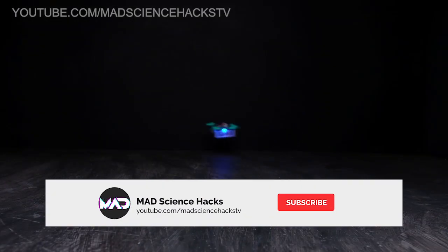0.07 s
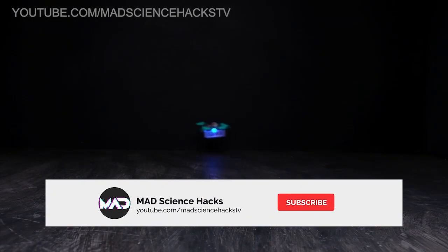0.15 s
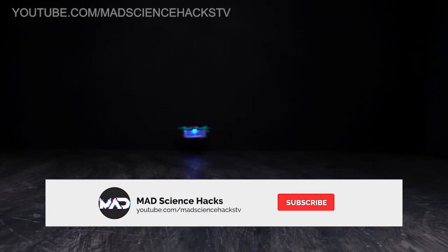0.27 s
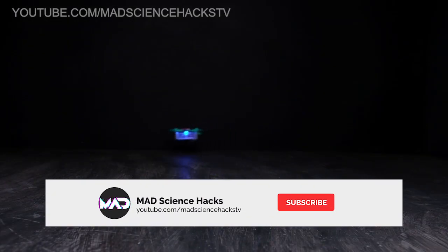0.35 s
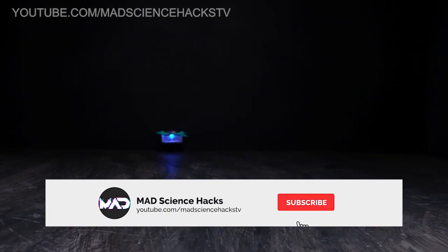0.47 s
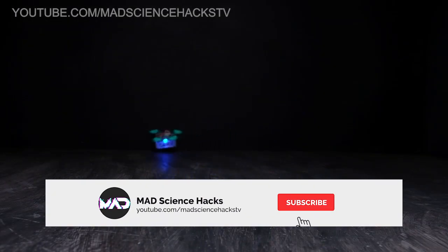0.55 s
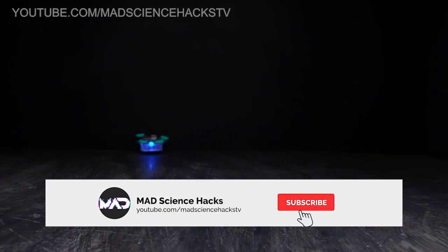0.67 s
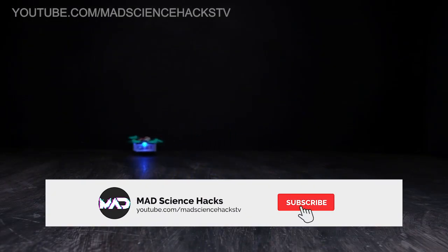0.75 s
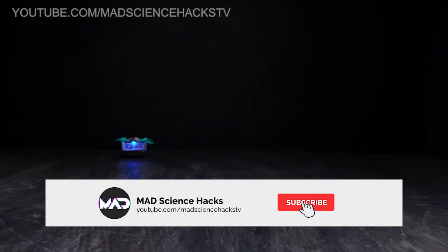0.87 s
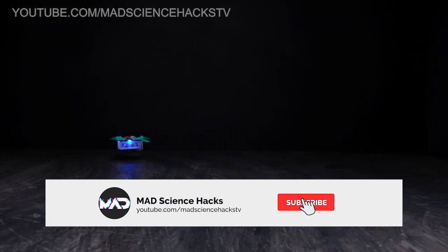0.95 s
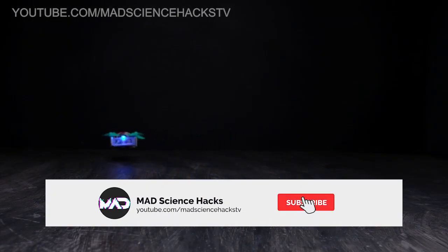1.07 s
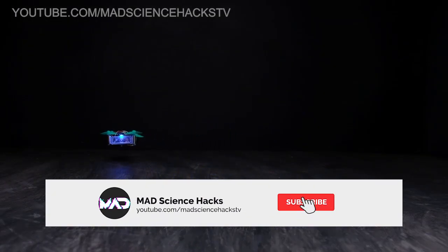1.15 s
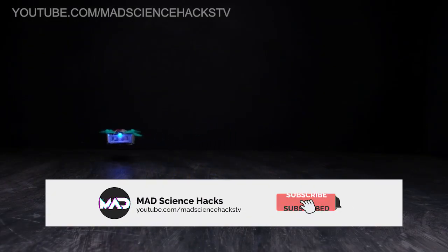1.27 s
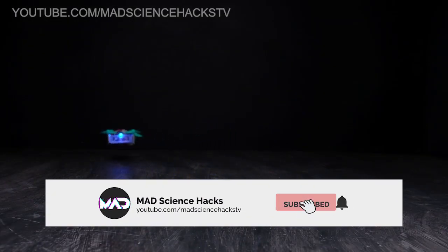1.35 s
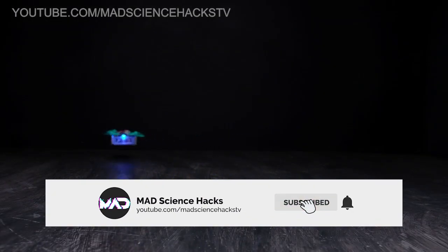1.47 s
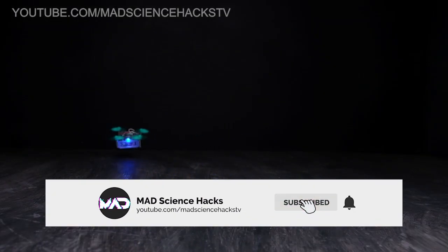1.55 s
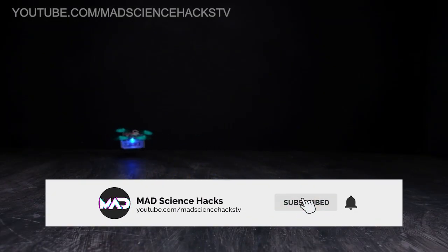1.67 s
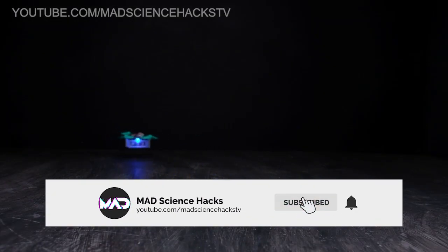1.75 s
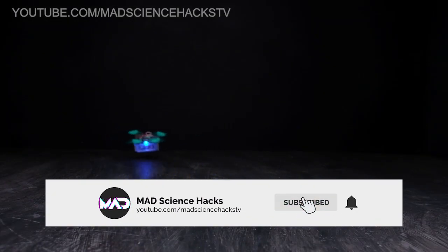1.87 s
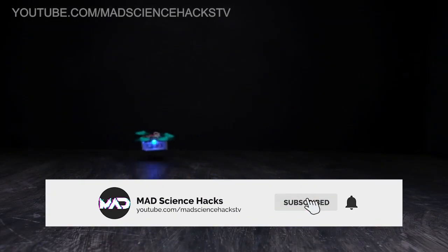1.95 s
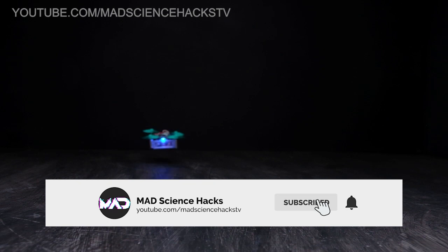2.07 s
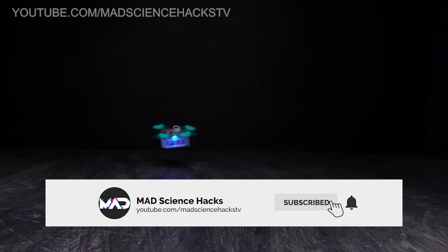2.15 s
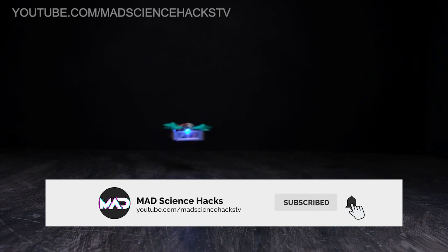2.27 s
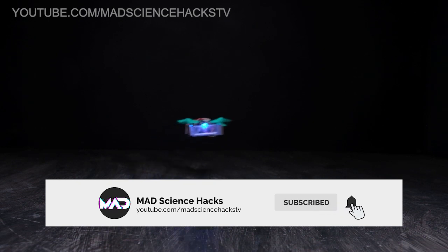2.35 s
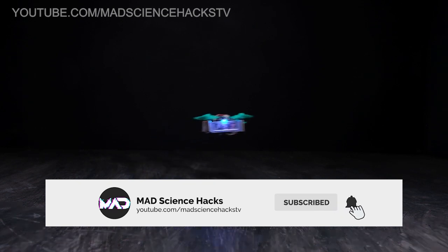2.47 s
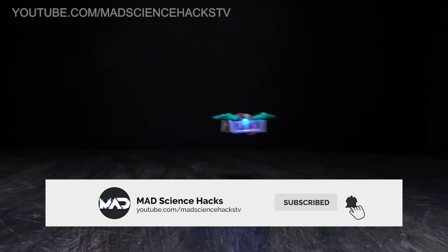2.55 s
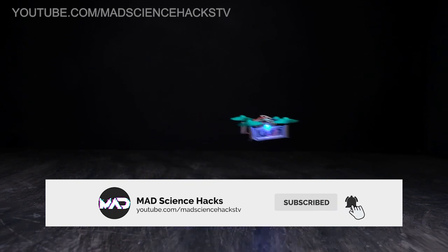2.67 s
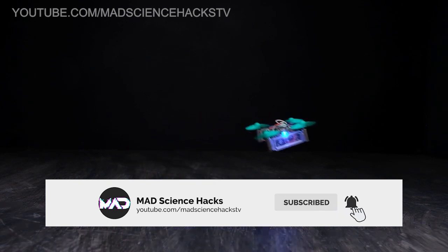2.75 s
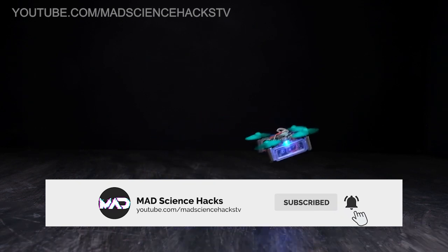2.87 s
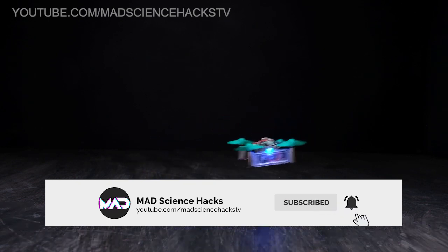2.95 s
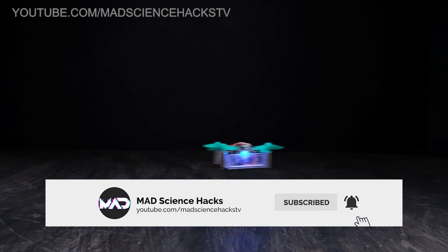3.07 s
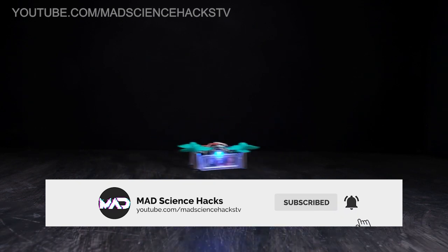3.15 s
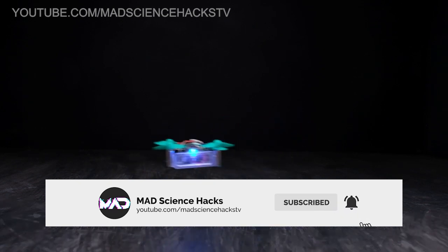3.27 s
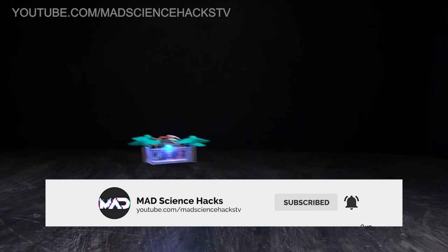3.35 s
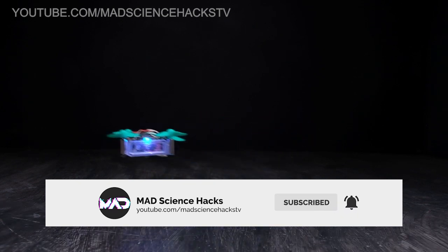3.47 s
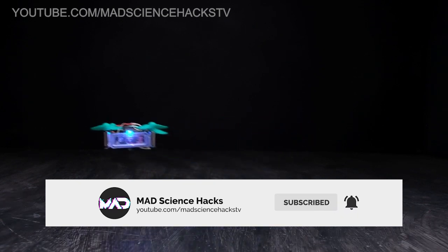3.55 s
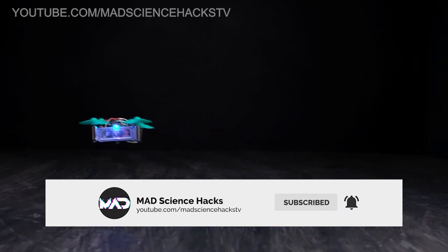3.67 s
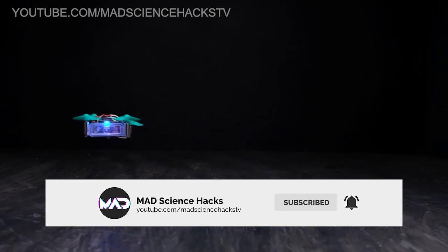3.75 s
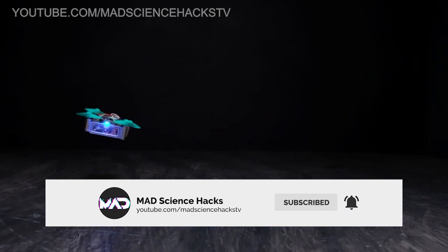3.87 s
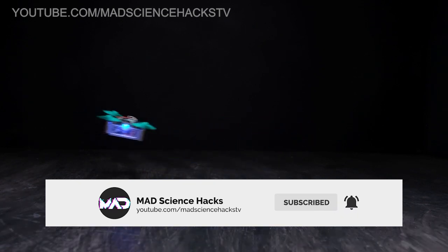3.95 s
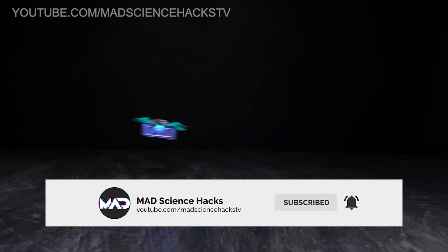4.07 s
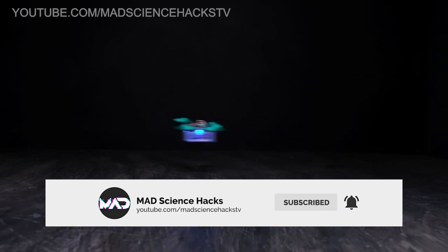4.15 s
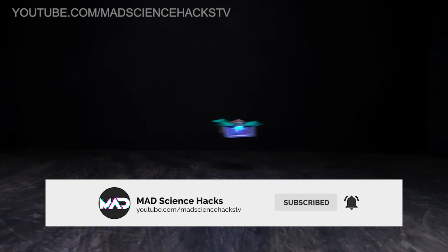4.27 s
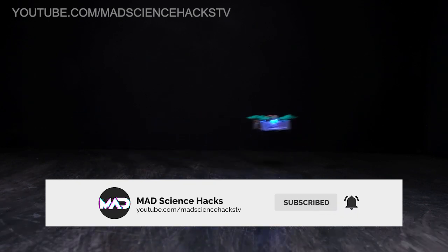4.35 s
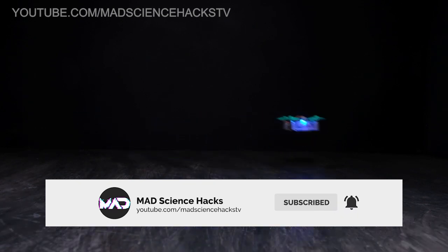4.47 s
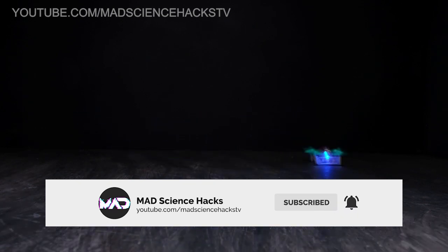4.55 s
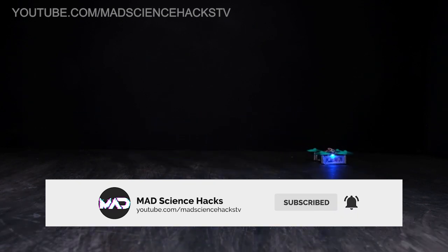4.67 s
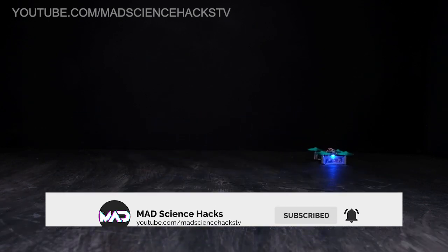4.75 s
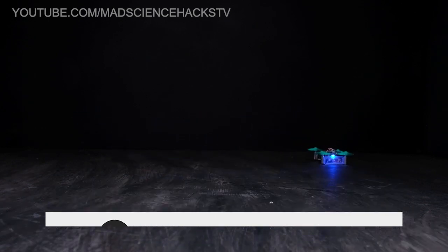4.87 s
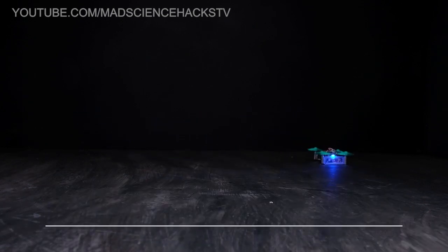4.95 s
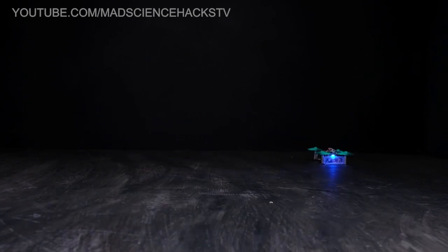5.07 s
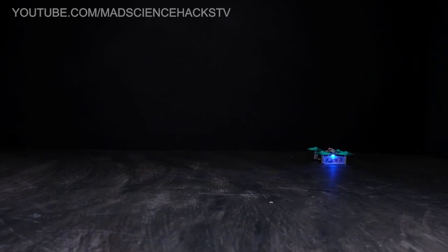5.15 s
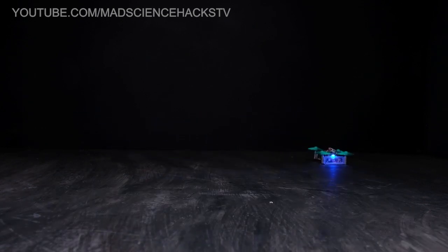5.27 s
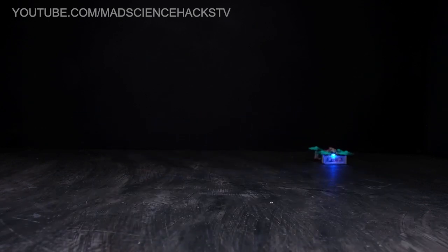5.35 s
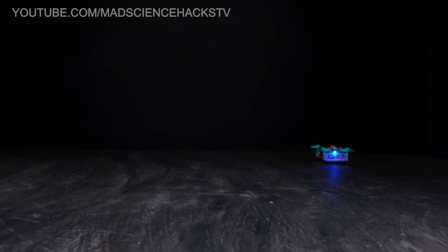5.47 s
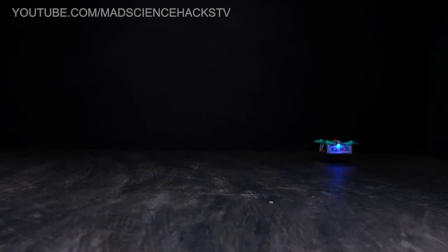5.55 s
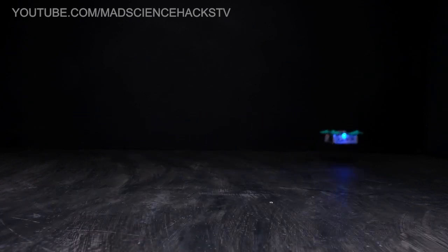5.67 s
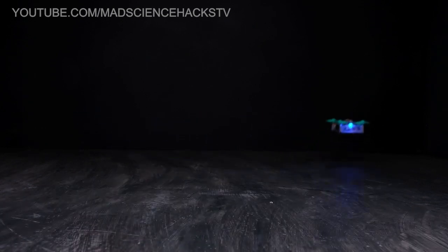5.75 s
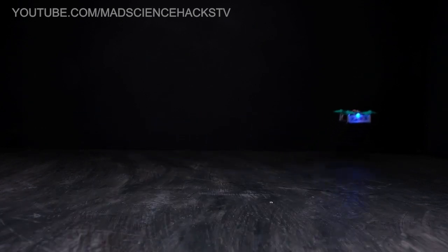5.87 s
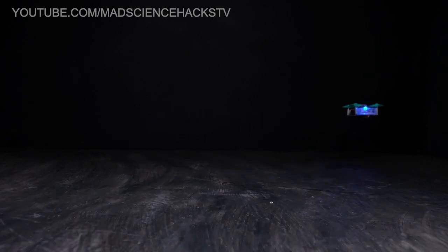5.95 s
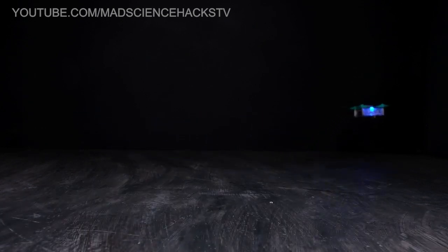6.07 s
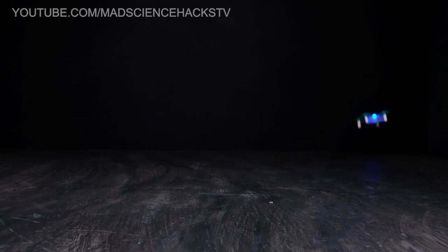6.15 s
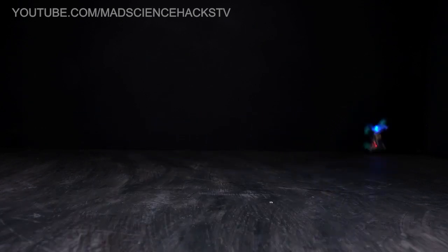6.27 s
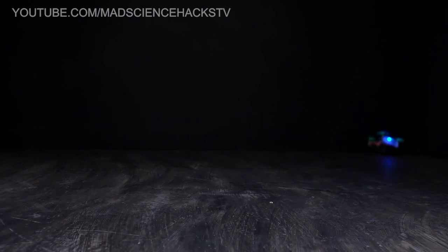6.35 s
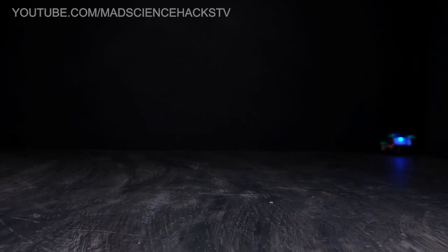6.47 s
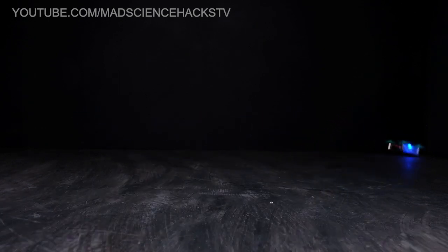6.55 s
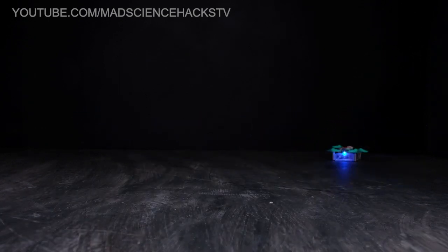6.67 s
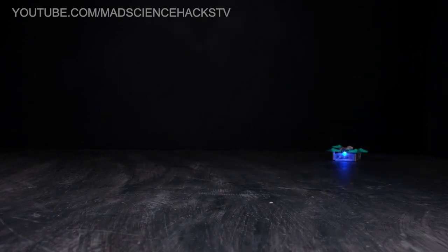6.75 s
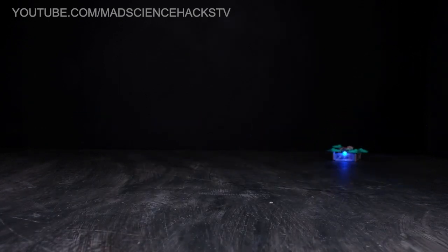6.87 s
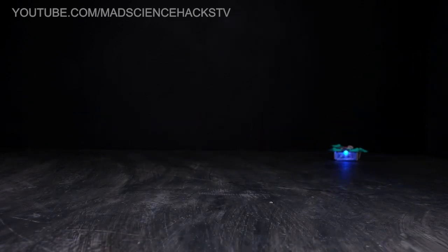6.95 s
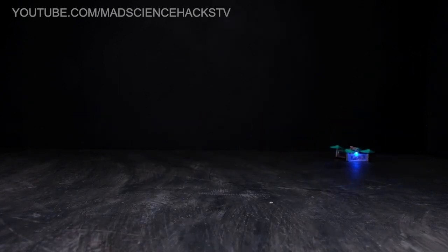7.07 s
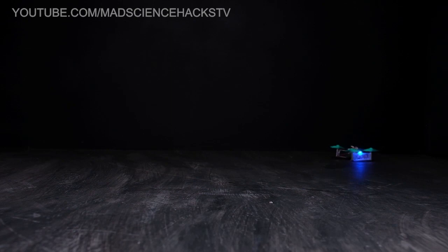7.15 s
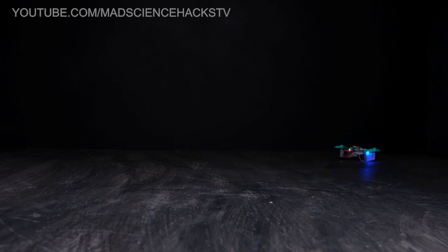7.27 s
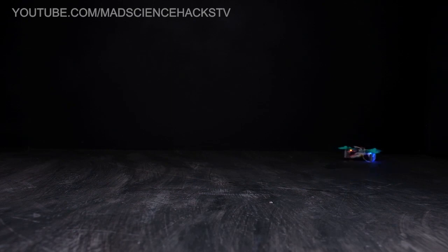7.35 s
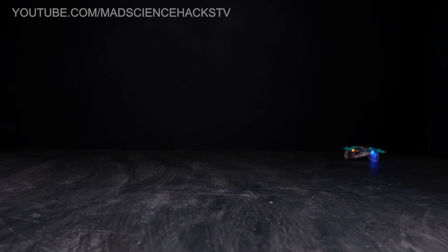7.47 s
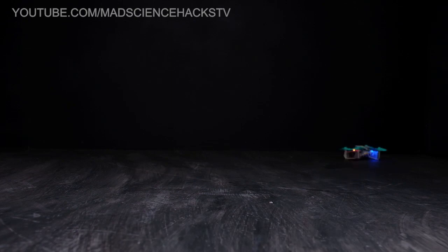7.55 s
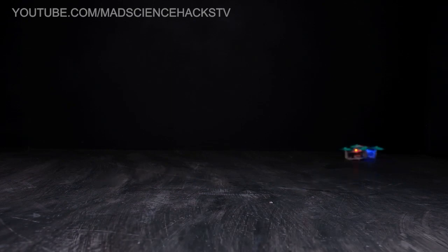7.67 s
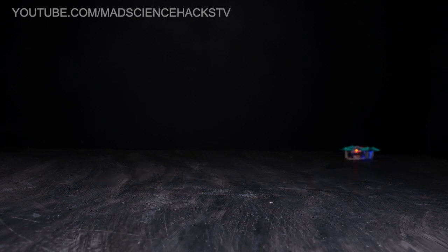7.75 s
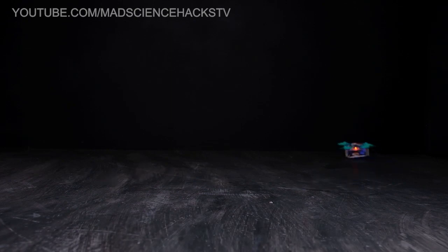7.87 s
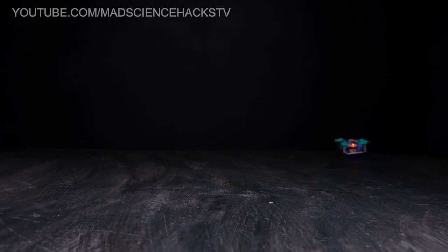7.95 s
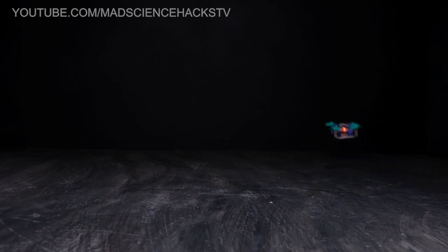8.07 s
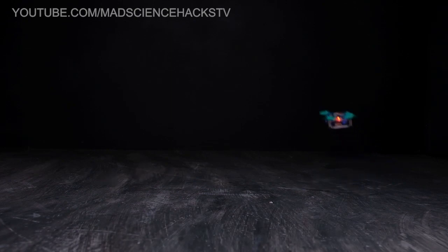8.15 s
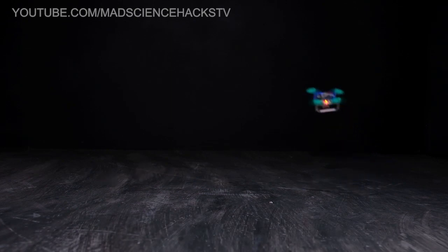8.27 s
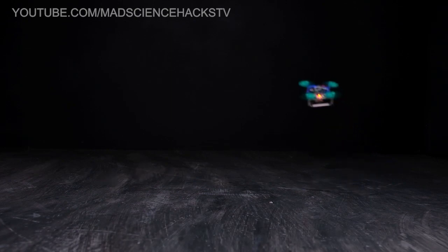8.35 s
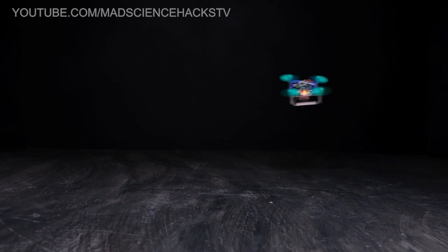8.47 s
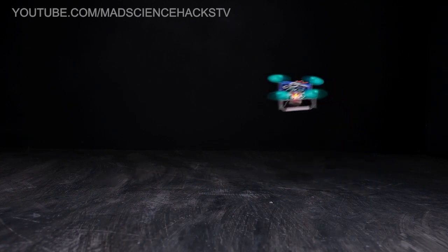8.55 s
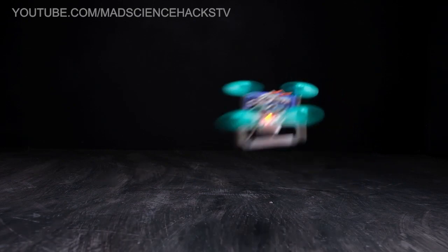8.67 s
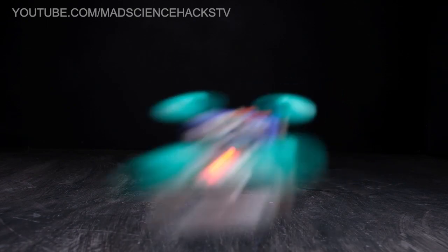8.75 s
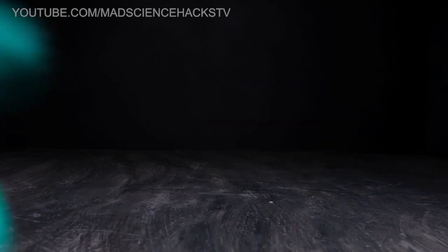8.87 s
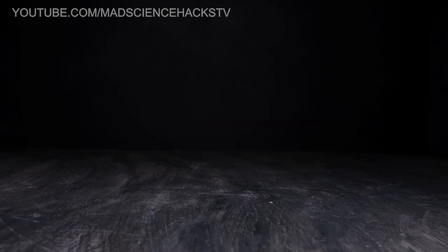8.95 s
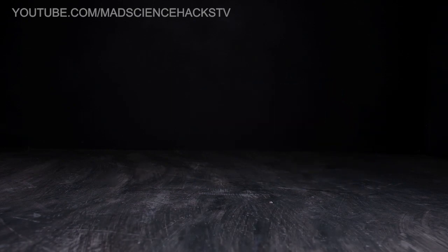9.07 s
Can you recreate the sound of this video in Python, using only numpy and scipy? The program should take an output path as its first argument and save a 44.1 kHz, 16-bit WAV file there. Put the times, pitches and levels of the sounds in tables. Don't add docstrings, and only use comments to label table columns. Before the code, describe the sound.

A tiny drone whines and hisses in a bare room, knocks something, drops and slides, flies again, crashes, restarts, hops, then smashes into the wall.

```python
import sys
import numpy as np
from scipy import signal
from scipy.fft import rfft, irfft, next_fast_len
from scipy.io import wavfile
from scipy.ndimage import uniform_filter1d

SR = 44100
rng = np.random.default_rng(int(sys.argv[2]) if len(sys.argv) > 2 else 0)


def generate_wav(signal):
    frames = np.transpose(np.atleast_2d(signal))
    scaled = np.clip(frames, -1, 1) * 32767
    pcm = np.round(scaled).astype(np.int16)
    wavfile.write(sys.argv[1], SR, pcm)


def makeup_ratio(level_db):
    decades = np.asarray(level_db, float) / 20
    return 10 ** decades


N = 401310

# pitch_hz, level_db [dB per Hz]
FAN_COLOUR = [(15, 5), (40, -3.5), (150, -24), (500, -8), (1000, -19), (1400, -27.5), (2700, -37),
              (4000, 0.5), (4600, -21), (7000, -34), (9800, -14.5), (15600, -35)]
FAN_DB = -58
HUM_HZ, HUM_DB, HUM_ENDS_S = 100, -69, 6.74
# pitch_hz, time to fade by 60 dB [s]
ROOM_FADE = [(100, 0.98), (500, 0.39), (1500, 0.43), (4000, 0.31), (12000, 0.32)]

# start_s, blade_hz (blades passing, fastest rotor), tone_db and wash_db at hover speed
COURSE = [(0, 1533, -41.5, -39.5), (.38, 1591, -41, -39), (1.4, 1574, -40, -39.5), (2.2, 1624, -39.5, -39),
          (2.5, 1709, -41.5, -40.5), (2.9, 1644, -40, -38.5), (3.75, 1649, -40, -38.5),
          (4.1, 1714, -44.5, -39.5), (4.41, 1651, -38.5, -40.5), (5.2, 1052, -39, -37.5),
          (5.33, 1205, -38, -35.5), (5.42, 1475, -42.5, -36), (5.899, 1662, -42.5, -41),
          (6.2, 1519, -43.5, -41), (7.92, 1542, -39.5, -38.5), (8.42, 1725, -42.5, -42),
          (8.7, 1653, -41.5, -36.5), (8.83, 1635, -31.5, -31.5)]
HOVER_HZ = 1600
TONE_POWER, WASH_POWER = 3.46, 2.25
CUT_S, COAST_S, COAST_HZ, OPEN_S = 4.42, .14, 392.7, 5.0
IDLE_S, IDLE_HZ, IDLE_TONE_DB, IDLE_WASH_DB = 6.74, 1434, -37.5, -46.5
GROUND_TONE_DB, GROUND_WASH_DB = -42.5, -42.5
# top_s, top_hz, rise_s
HOPS = [
    (7.0, 1940, .09),
    (7.165, 1830, .042),
    (7.305, 1861, .042),
    (7.435, 1796, 0.0399),
    (7.556, 1812, .045),
    (7.685, 1773, .042),
    (7.825, 1787, .04),
]
# start_s, back_s, tone_loss_db, wash_loss_db, fall_s
STALLS = [
    (0.547, 0.686, -10, -1.5, .02),
    (4.422, 5.05, -4.5, -0.5, .08),
    (6.256, 6.739, -35, -27, 0.0351),
    (8.842, 9.3, -36, -18.5, .06),
]

# lag (share of speed), level_db, shake_turns, slower_pair (0 or 1)
ROTORS = [(-.01, 0, 0, 0), (.03, -7, .04, 0), (.12, 0, .47, 1), (.22, -10, .1, 1)]
# multiple of shaft speed, level_db
SHAFT_TONES = [(1, -19), (2, -23), (3, -21), (4, 0), (5, -22), (7, -24), (8, -7), (9, -22), (10, -19),
               (11, -20), (12, -9), (15, -15), (16, -14), (20, -19), (28, -22), (32, -21)]
# start_s, shake_percent of speed, slower rotors' lag (factor), slower_pair_db
STABILISER = [(0, 1.2, 1.1, 0), (.3, 3.2, 1.1, -3), (.75, 2.6, .85, -1.5), (1.35, 3.2, 1.05, -3),
              (1.7, 3.6, 1.3, -8), (2.3, 4.3, 1.45, -6), (3.5, 5.5, 1.2, -9), (4.0, 4, 1.4, -4),
              (4.42, 3, 1.6, -5), (4.5, .7, .63, 3), (5.3, .9, .7, -2.5), (5.5, 3.8, .8, -1.5),
              (6.25, 3, 1.3, -3), (6.74, .03, .3, -11), (6.92, .05, .35, -9), (7.0, .5, .55, -7),
              (7.9, 1.8, .5, -4), (8.84, 4.5, 1.3, -5)]
SHAKE_HZ = 22
# start_s, turns
SHAKE_STARTS = [
    (0, 0.55),
    (.55, 0.336),
    (4.998, 0.593),
    (6.5, 0.16),
]
SHAKE_WANDER = .06
TRIM_WANDER = .006
BITE_DB = .8

# pitch_hz, level_db
WASH_COLOUR = [(100, -44), (250, -21), (600, -19.5), (1000, -14), (1400, -5.5), (2200, -10), (3200, -7.5),
               (3900, -6), (4600, -7.5), (5600, -8.5), (8300, -10.5), (10400, -17.5), (12500, -17),
               (15600, -21.5)]
# start_s, extra_path_ms, share
FLOOR_ECHO = [(0, .7, .3), (.8, .8, .2), (1.25, 1.75, .45), (1.77, 1.25, .55), (2.3, 1.75, .55),
              (2.6, 1.6, .15), (4.5, 1.6, .15), (5.7, 1.5, .3), (6.7, 1.3, .25), (8.1, .75, .35),
              (9.1, .6, .15)]
LOW_WASH_AIR_DB, LOW_WASH_GROUND_DB, HIGH_WASH_GROUND_DB, LIFT_S = 2, -4.5, 3, 7.88

# start_s, peak_db, crack_db (against the peak), room_db, chatter_ms
KNOCKS = [(0.544, -3, 0, -8, 5.4), (4.611, -9, -13.5, -4.5, 8.1), (4.668, -21, -10, -25, 3.1),
          (4.69, -28, -1.5, -6, 2.5), (6.257, 1, -6, -10.5, 6.4), (6.314, -22, 6.5, -18, 5.5),
          (6.333, -22, 5, -1.5, 3.2), (6.402, -18.5, 5.5, -4, 8.9), (6.423, -27.5, 4, 4.5, 5.7),
          (6.463, -27, 10, -5, 6.9), (6.509, -25.5, 6.5, 4, 7.1), (6.552, -31.5, 0.5, -28, 11),
          (6.624, -9.5, -16, -7, 2.4), (6.699, -41, 4, -43, 3.34), (8.842, 4, -4.5, -16.5, 4.9),
          (8.856, -17.5, 10, -12, 7.3), (8.933, -22.5, 9, -14.5, 6.2), (9.041, -8, -4, -7.5, 8.6),
          (9.053, -11, -5.5, -11.5, 11), (9.082, -23, -3.5, -9, 11)]
THUD_DB, THUD_PER_CRACK, WALL_S, WALL_THUD_DB = -27.5, -0.58, 7.5, -11.5
# pitch_hz, width_hz, level_db
FLOOR = [(125, 35, -2.5), (377, 51, 6), (508, 96, -4)]
# pitch_hz, width_hz, level_db
FRAME = [(1515, 177, 5), (664, 580, 0), (2004, 390, -3), (3450, 1200, 2)]
# pitch_hz, width_hz, level_db
SHELL = [(4070, 670, -12.5), (5940, 720, 4), (7420, 440, 4.5), (8840, 320, 6), (13660, 730, -3)]
# start_s, peak_db
BUMPS = [(1.21, -57), (1.458, -57.5), (3.269, -67), (5.103, -61), (6.997, -61), (7.114, -49), (7.244, -55),
         (7.396, -54.5), (7.498, -55.5), (7.637, -51.5), (7.679, -58), (7.773, -52), (7.829, -59)]
# start_s, end_s, floor_db, frame_db, shell_db
SLIDES = [
    (4.62, 4.75, -43.5, -50, -58),
    (6.27, 6.618, -36, -37, -36),
    (6.617, 6.735, -33.5, -37.5, -56.5),
]
SLIDE_FADE_DB = -7
# start_s, rumble_db
MIC_SHAKE = [
    (8.838, -88),
    (8.846, -22),
    (8.9, -79),
    (9.03, -62),
    (9.05, -57),
    (9.1, -46),
]
# start_s, tick_hz, level_db
BLADE_RUB = [
    (8.869, 854, -54.5),
    (8.873, 840, -21),
    (8.889, 838, -14.5),
    (8.898, 800, -54),
    (8.905, 810, -33),
    (8.93, 792.7, -53),
]


def rms_one(x):
    return x / np.sqrt(np.mean(x ** 2) + 1e-20)


def in_time(rows):
    s, *columns = np.transpose(rows)
    return [np.interp(np.arange(N) / SR, s, column) for column in columns]


def at_hz(points, hz):
    table_hz, values = np.array(points)[:, 0], np.array(points)[:, 1]
    return np.interp(np.log(hz), np.log(table_hz), values)


def drift(rate):
    r = np.exp(-80 * np.pi * rate / SR)
    slow = signal.lfilter([1], [1, -2 * r, r * r], rng.standard_normal(N // 40 + 2002))[2000:]
    return np.interp(np.arange(N) / 40, np.arange(len(slow)), rms_one(slow - slow.mean()))


def band(x, low_hz, high_hz):
    edges_hz = [low_hz, min(high_hz, .45 * SR)]
    return signal.sosfilt(signal.butter(2, edges_hz, "band", fs=SR, output="sos"), x)


def coloured(spectrum):
    size = next_fast_len(N)
    hz = np.maximum(np.arange(size // 2 + 1) * SR / size, 1)
    white = rfft(rng.standard_normal(size))
    return rms_one(irfft(white * makeup_ratio(at_hz(spectrum, hz)), size)[:N])


def resonate(x, modes):
    out = 0.51 * x
    for k, (hz, width_hz, db) in enumerate(modes):
        r = np.exp(-np.pi * width_hz / SR)
        push = np.array([1, 0, -1]) * (1 - r * r) / 2
        ring = [1, -2 * r * np.cos(2 * np.pi * hz / SR), r * r]
        out = out + (-1) ** k * makeup_ratio(db) * signal.lfilter(push, ring, x)
    return out


def room(x):
    t, tail = np.arange(SR) / SR, 0
    early = 1 + 1.2 * np.exp(-t / 0.045)
    for hz in 90 * 2. ** np.arange(8):
        octave = band(rng.standard_normal(SR), hz / np.sqrt(2), hz * np.sqrt(2))
        tail = tail + octave * makeup_ratio(-60 * t / at_hz(ROOM_FADE, hz)) * early
    tail = tail * np.clip((t - .004) / 0.0061, 0, 1)
    return signal.fftconvolve(x, tail / np.sqrt(np.sum(tail ** 2)))[:N]


def background():
    t = np.arange(N) / SR
    hum = makeup_ratio(HUM_DB + 1.52 * drift(3.6)) * np.sqrt(2) * np.sin(2 * np.pi * HUM_HZ * t) * (t < HUM_ENDS_S)
    fan = makeup_ratio(FAN_DB + 0.95 * drift(3)) * coloured(FAN_COLOUR)
    return fan - .4 * (t > HUM_ENDS_S) * band(fan, 40, 170) + hum


def flight():
    t, ground = np.arange(N) / SR, (GROUND_TONE_DB, GROUND_WASH_DB)
    rows = COURSE + [(IDLE_S, IDLE_HZ, IDLE_TONE_DB, IDLE_WASH_DB)]
    for s, hz, rise in HOPS:
        rows = rows + [(s - rise, IDLE_HZ, *ground), (s, hz, *ground)]
    blade_hz, tone_db, wash_db = in_time(sorted(rows))

    before, after = COURSE[8], COURSE[9]
    shut_s = np.clip(t, CUT_S, OPEN_S) - CUT_S
    coast = COAST_HZ + (before[1] - COAST_HZ) * np.exp(-shut_s / COAST_S)
    climb = np.clip((t - OPEN_S) / (after[0] - OPEN_S), 0, 1)
    coasting = (t > CUT_S) & (t < after[0])
    blade_hz = np.where(coasting, coast + climb * (after[1] - coast), blade_hz)
    blade_hz = uniform_filter1d(blade_hz, size=500)

    speed_db = 20 * np.log10(blade_hz / HOVER_HZ)
    tone_db = tone_db + TONE_POWER * speed_db
    wash_db = wash_db + WASH_POWER * speed_db
    for s, back, tone_loss_db, wash_loss_db, fall in STALLS:
        lost = np.clip(np.minimum((t - s) / fall, (back - t) / .004), 0, 1)
        tone_db = tone_db + tone_loss_db * lost
        wash_db = wash_db + wash_loss_db * lost
    return blade_hz, tone_db, wash_db


def rotors(blade_hz):
    shake, lag, slow_db = in_time(STABILISER)
    t, (since, turns) = np.arange(N) / SR, np.transpose(SHAKE_STARTS)
    swing = SHAKE_HZ * t + turns[np.searchsorted(since, t, side="right").clip(1) - 1]
    tone, beat = 0, 0
    for share, db, turn, slow in ROTORS:
        shaking = np.sin(2 * np.pi * (swing + turn + SHAKE_WANDER * drift(3)))
        stray = .12 * drift(12) + 100 * TRIM_WANDER * (.3 + slow) * drift(2.5)
        flutter = .007 * np.minimum(shake * 3, 1) * drift(30)
        wobble = shake / 100 * (shaking + stray) + flutter
        shaft_hz = blade_hz / 4 * (1 - share * lag + wobble)
        angle = (2 * np.pi * (np.cumsum(shaft_hz) / SR % 1)).astype(np.float32)
        gusts = makeup_ratio(db + slow * slow_db + .22 * shake * drift(12) + BITE_DB * shake * shaking)
        lines = [makeup_ratio(level_db) * np.sin(k * angle + rng.uniform(0, 7.27)) for k, level_db in SHAFT_TONES]
        unbalance = makeup_ratio(-6 * slow + 4.9 * np.minimum(drift(12), 1)) * lines[0]
        upper = makeup_ratio(-.9 * shake) * sum(lines[4:])
        tone = tone + gusts * (unbalance + sum(lines[1:4]) + upper)
        beat = beat + np.cos(4 * angle) / 4
    return rms_one(tone), beat


def wash(beat):
    hiss = coloured(WASH_COLOUR) * (1 + .5 * beat) * makeup_ratio(.6 * drift(15))
    low_db = in_time([(IDLE_S - .1, LOW_WASH_AIR_DB), (IDLE_S, LOW_WASH_GROUND_DB),
                      (LIFT_S - .05, LOW_WASH_GROUND_DB), (LIFT_S + .1, LOW_WASH_AIR_DB)])[0]
    hiss = hiss + (makeup_ratio(low_db) - 1) * band(hiss, 760, 1600)
    hiss = hiss + (makeup_ratio(HIGH_WASH_GROUND_DB) - 1) * (low_db < 0) * band(hiss, 8000, 15500)
    path_ms, share = in_time(FLOOR_ECHO)
    heard_at = np.arange(N) - path_ms * SR / 1000
    hiss = hiss + share * np.interp(heard_at, np.arange(N), band(hiss, 2400, 6200))
    return hiss / np.std(band(hiss, 2300, 15000))


def knocks():
    direct_drive, room_drive = np.zeros((3, N)), np.zeros((3, N))
    t = np.arange(int(.06 * SR)) / SR
    for s, db, crack_db, room_db, ms in KNOCKS:
        thud_db = THUD_DB + THUD_PER_CRACK * crack_db + WALL_THUD_DB * (s > WALL_S)
        chatter = rng.standard_normal(len(t)) * makeup_ratio(4.7 * rng.standard_normal(len(t)))
        shape = np.clip(t * 1000 / (0.38 * ms), 0, 1) * np.exp(-(t * 1000 / ms) ** 2)
        at = round(s * SR) - 30
        levels = makeup_ratio([db + thud_db + 18.5, db + 3.0, db + crack_db])
        part = np.outer(levels, chatter * shape)[:, :N - at]
        direct_drive[:, at:at + len(t)] += part
        room_drive[:, at + 40] += np.sqrt(np.sum(part ** 2, axis=1)) * makeup_ratio(room_db)
    thud, frame, shell = np.stack([direct_drive, room_drive], axis=1) + 1e-18
    struck = resonate(band(thud, 80, 710), FLOOR)
    struck = struck + resonate(band(frame, 573, 3480), FRAME)
    struck = struck + resonate(band(shell, 3060, 13000), SHELL)
    direct, sent = struck
    return direct + room(sent)


def bumps():
    out, t = np.zeros(N), np.arange(int(.08 * SR)) / SR
    shape = np.clip(t / 0.0045, 0, 1) * np.exp(-t / 0.041)
    for s, db in BUMPS:
        at = round(s * SR)
        out[at:at + len(t)] += makeup_ratio(db) * rng.standard_normal(len(t)) * shape
    return makeup_ratio(22.5) * band(out + 1e-18, 112.0, 470)


def tumble():
    t, levels = np.arange(N) / SR, np.zeros((3, N))
    for s, end, *db in SLIDES:
        fade = makeup_ratio(SLIDE_FADE_DB * np.clip((t - s) / (end - s), 0, 1))
        gate = np.clip(np.minimum(t - s, end - t) / 0.0064, 0, 1)
        levels += np.outer(makeup_ratio(db), fade * gate)
    grains = rng.standard_normal((3, N)) * makeup_ratio(6.8 * rng.standard_normal(N) + 1.1 * drift(60))
    floor = rms_one(resonate(band(grains[0], 73, 1370), FLOOR))
    frame = rms_one(band(grains[1], 670, 5400))
    shell = rms_one(resonate(band(grains[2], 4800, 15000), SHELL))
    return levels[0] * floor + levels[1] * frame + levels[2] * shell


def mic_rumble():
    noise = rng.standard_normal((2, N))
    shudder = rms_one(band(noise[0], 2.2, 52.2)) + makeup_ratio(3.5) * rms_one(band(noise[1], 240, 420))
    return makeup_ratio(in_time(MIC_SHAKE)[0]) * shudder


def blade_rub():
    hz, db = in_time([(8.86, 867, -120)] + BLADE_RUB + [(8.94, 800, -120)])
    ticks = np.diff(np.floor(np.cumsum(hz) / SR), prepend=0) * makeup_ratio(1.7 * rng.standard_normal(N))
    buzz = band(resonate(ticks, FRAME + SHELL), 1050, 4500) + 0.032 * rng.standard_normal(N)
    return makeup_ratio(db) * rms_one(buzz)


def scene():
    blade_hz, tone_db, wash_db = flight()
    tone, beat = rotors(blade_hz)
    drone = makeup_ratio(tone_db + 0.5) * tone + makeup_ratio(wash_db - 1.57) * wash(beat)
    drone = drone + makeup_ratio(-11) * room(drone)
    contacts = knocks() + bumps() + tumble() + mic_rumble() + blade_rub()
    return (background() + drone + contacts)[None]


def low_pass(x):
    return signal.sosfilt(signal.butter(12, 15800, fs=SR, output="sos"), x)


def record(dry):
    level_db = 20 * np.log10(uniform_filter1d(np.abs(dry), size=89) + 1e-9)
    ramp = 90 * np.arange(N) / SR
    held_db = np.maximum.accumulate(level_db + ramp, axis=1) - ramp
    over_db = np.maximum(held_db + 11.5, 0)
    r = np.exp(-1 / (0.011 * SR))
    ducked = dry * makeup_ratio(-.8 * signal.lfilter([1 - r], [1, -r], over_db))
    top = signal.cheby2(16, 30, 16000, fs=SR, output="sos")
    return low_pass(signal.sosfilt(top, np.clip(ducked, -.99, .99)))


dry = scene()
out = record(dry)
generate_wav(out)
```